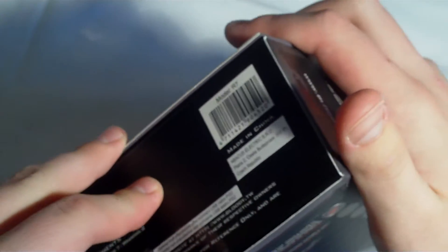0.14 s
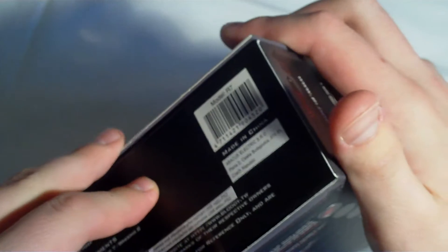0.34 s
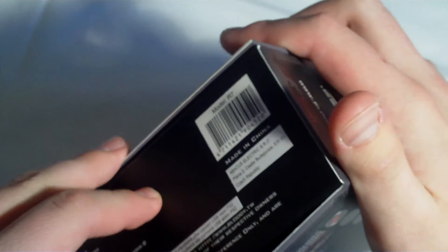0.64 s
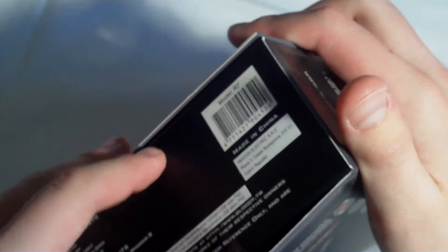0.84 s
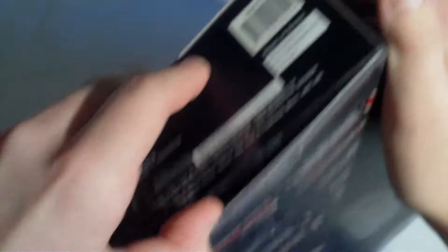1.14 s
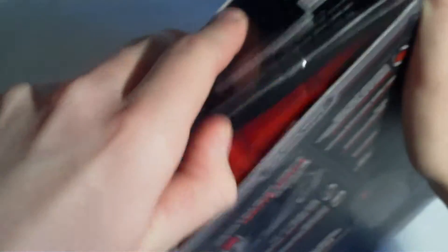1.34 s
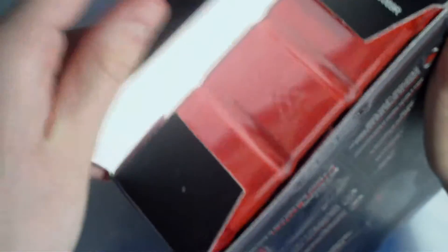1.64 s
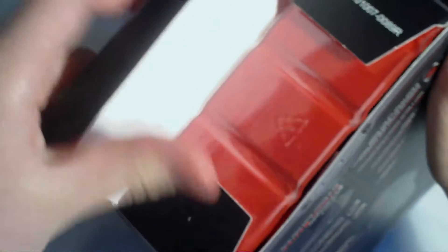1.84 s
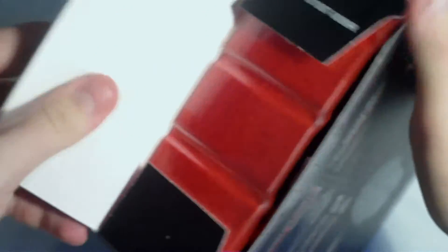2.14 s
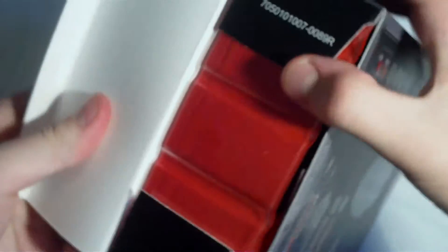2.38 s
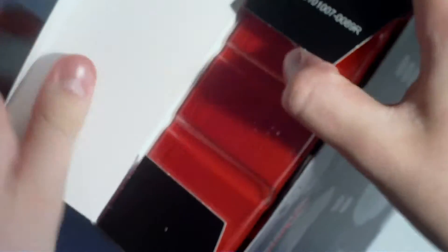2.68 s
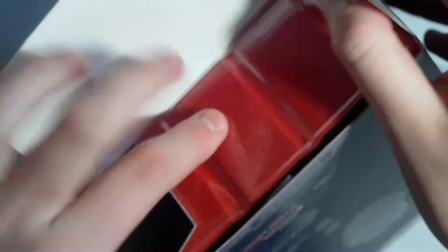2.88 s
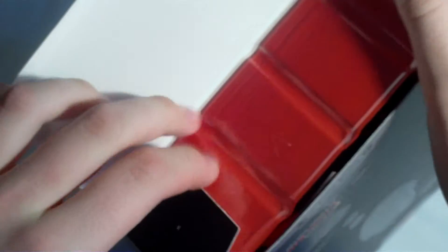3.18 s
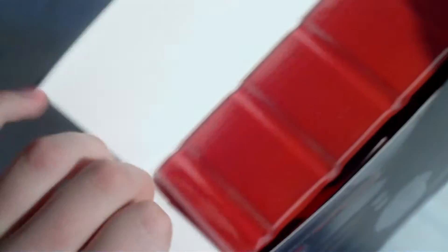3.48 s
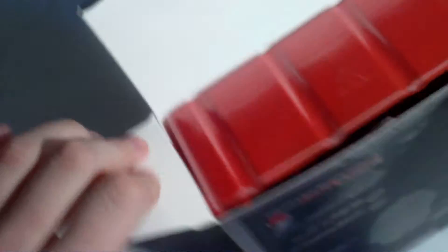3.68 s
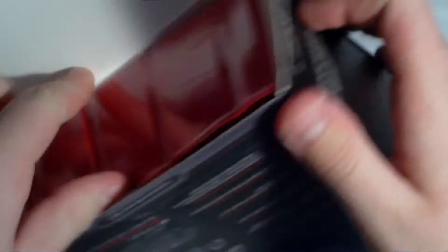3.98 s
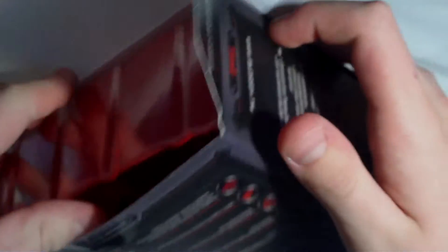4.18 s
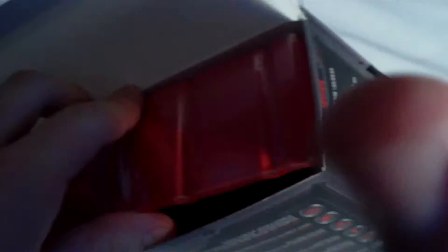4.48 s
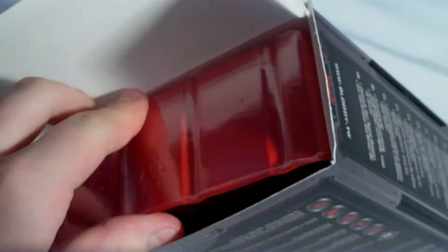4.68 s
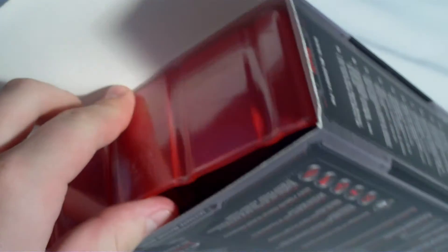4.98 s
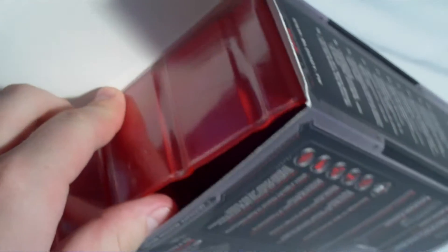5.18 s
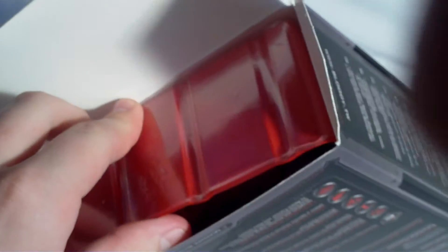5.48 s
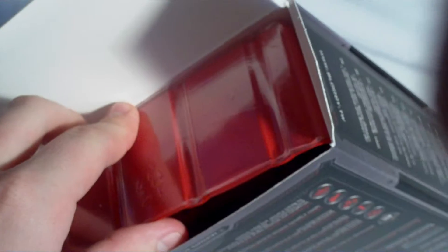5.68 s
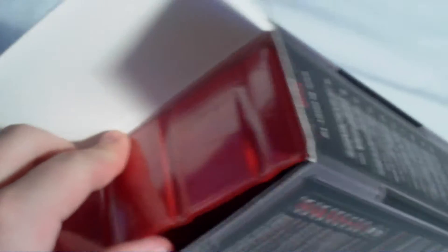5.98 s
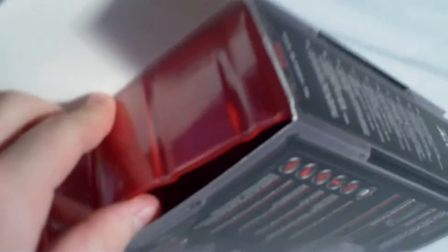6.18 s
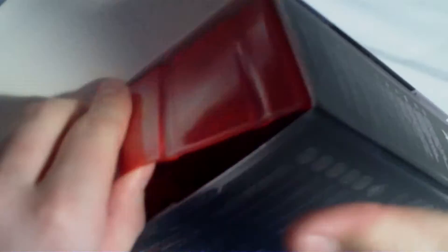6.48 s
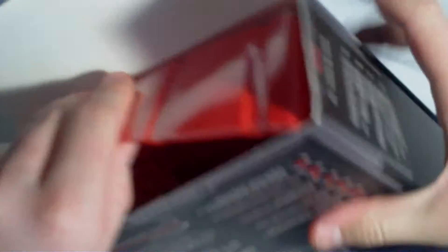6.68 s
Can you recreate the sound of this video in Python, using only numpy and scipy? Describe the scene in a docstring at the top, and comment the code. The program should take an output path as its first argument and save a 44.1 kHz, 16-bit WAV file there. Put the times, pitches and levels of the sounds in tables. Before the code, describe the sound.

Hands rustle, tap and creak open a glossy cardboard box up close, then a thin plastic tray crackles and snaps loudly as it is pulled.

```python
"""Hands open a glossy cardboard box close to a microphone: taps and creaks of the flaps are noise jolts and
firm pushes ringing through banks of card resonances, and rubbing is gritty noise swelled stroke by stroke.
Then a thin plastic tray is pulled, creaks and snaps loudly: such jolts in plastic resonances, with a thin ring.
Single-band noise swells add low wall thumps, thin tones and soft rubs; steady shaped noise hisses and rumbles."""
import sys
import numpy as np
from scipy import signal
from scipy.fft import rfft, irfft, next_fast_len
from scipy.io import wavfile
from scipy.ndimage import map_coordinates

SR = 44100
rng = np.random.default_rng(int(sys.argv[2]) if len(sys.argv) > 2 else 0)


def materialize(psi):
    """Save the field psi as 16-bit PCM at rate SR to the path in sys.argv[1].

    A 1-D psi becomes a single channel; in a 2-D psi each row is a channel.
    """
    bounded = np.clip(np.atleast_2d(psi).T, -1, 1)
    quanta = np.round(bounded * 32767).astype(np.int16)
    wavfile.write(sys.argv[1], SR, quanta)


def volts_from_decibels(level):
    """Turn decibel levels (scalar or array-like) into linear amplitude factors."""
    exponent = np.asarray(level, float) / 20
    return 10 ** exponent


N = 301423  # samples

# resonances of the card, one list each for walls, hollow, edges and skin: (f/Hz, width/Hz, relative level/dB)
CARD = [
    [(83, 120, -9.5), (195.6, 63, 2), (363.6, 140, 3.5)],
    [(762, 238, 8), (896.6, 140, 9), (1120, 530, 0.5)],
    [(2025, 1150, 6), (3930, 2100, -5), (5210, 1200, 0.5)],
    [(6580, 2000, -4.5), (9510, 3200, -7), (14150, 970, -20.5)],
]


def unit(x):
    """Bring to rms 1."""
    return x / np.sqrt(np.mean(x ** 2) + 1e-20)


def along(points, hz):
    """Read a curve of (f/Hz, value) points on a log frequency axis."""
    f, v = np.transpose(points)
    return np.interp(np.log(hz + 1), np.log(f + 1), v)


def wobble(rate):
    """A smooth random curve through rate knots a second."""
    knots = rng.standard_normal(int(N * rate / SR) + 4)
    return map_coordinates(knots, [np.arange(N) * rate / SR])


def filtered(x, response):
    """Shape x by a complex response of frequency, scaled to keep the power of white noise."""
    m = next_fast_len(N + SR // 2)
    gain = response(np.fft.rfftfreq(m, 1 / SR))
    gain = gain / np.sqrt(np.mean(abs(gain) ** 2))
    return irfft(rfft(x, m) * gain, m)[:N]


def rung(x, modes, order=1):
    """Ring x through parallel resonances of alternating sign; a higher order darkens the valleys."""
    def response(f):
        total = 0
        for k, (centre, width, db) in enumerate(modes):
            resonance = 1j * f * width / (centre * centre - f * f + 1j * f * width)
            total = total + (-1) ** k * volts_from_decibels(db) * resonance ** order
        return total
    return filtered(x, response)


def bursts(times, levels_db, rise, t60, drag_db, drag_t60, firm=0):
    """Short noise jolts, each trailing into a weaker drag; the share firm of a jolt's energy is one push."""
    t = np.arange(SR // 5) / SR
    swell = 1 - np.exp(-(t / rise) ** 2)
    jolt = swell * volts_from_decibels(-60 * t / t60)
    drag = swell * volts_from_decibels(drag_db - 60 * t / drag_t60)
    lead = 1.5 * rise  # s from the onset to the contact time
    push = np.sqrt(firm) * np.linalg.norm(jolt) * (np.arange(len(t)) == round(lead * SR))
    shape = np.sqrt(1 - firm) * jolt + drag
    out = np.zeros(N + len(t))
    for s, db in zip(times, levels_db):
        start = round((s - lead) * SR)
        out[start:][:len(t)] += volts_from_decibels(db + 1.5) * (push + shape * rng.standard_normal(len(t)))
    return out[:N]


def struck(events, body, follow, rise, t60, drag_db, drag_t60):
    """Each contact jolts walls, hollow, edges and skin; the higher the part, the faster the jolt rises.
    Rise, t60 and drag are those of the hollow; also returns the bare skin jolts."""
    firm = 0.4  # energy share of the push in walls and hollow
    s, ring, thump, tick = np.transpose(events)
    crack = follow[0] * tick + follow[1]  # the edges follow the sharpness in part
    walls, hollow, edges, skin = body
    wall_jolts = bursts(s, ring + thump + 4, 1.2 * rise, 0.96 * t60, drag_db + 3.5, drag_t60, firm)
    hollow_jolts = bursts(s, ring, rise, t60, drag_db, drag_t60, firm)
    edge_jolts = bursts(s, ring + crack, 0.69 * rise, 1.056 * t60, drag_db, drag_t60)
    skin_jolts = bursts(s, ring + tick, rise / 2, 0.81 * t60, drag_db - 12.5, drag_t60, firm / 2)
    low = rung(wall_jolts, walls, order=2)
    mid = rung(hollow_jolts, hollow, order=2)
    high = rung(edge_jolts, edges, order=2)
    top = rung(skin_jolts, skin, order=2)
    return low + mid + high + top, skin_jolts


def hiss():
    """Steady hiss and rumble: white noise shaped by a fixed spectrum."""
    # spectrum of the noise bed: (f/Hz, relative level/dB)
    spectrum = [(15, -12.5), (25, 2.5), (317, -6.5), (863, -9.5), (988, -6.5), (1160, -13.5), (6740, -23.5),
                (14800, -30.5), (16000, -56)]
    return volts_from_decibels(-63) * filtered(rng.standard_normal(N), lambda hz: volts_from_decibels(along(spectrum, hz)))


def band_swells():
    """Noise in one resonance, swelling and fading: from low wall thumps to thin tones and soft tray rubs."""
    # single-band swells: (middle t/s, half length/s, f/Hz, width/Hz, level/dB)
    bands = [(0.244, 0.22, 764, 89, -65), (1.41, 0.054, 2110, 1500, -47.5),
             (1.914, 0.021, 4700, 1000, -57.5), (2.09, .018, 192, 40, -42.5), (2.27, 0.017, 338, 90, -51),
             (3.569, 0.012, 3970, 600, -47.5), (4.697, 0.099, 1190, 690, -65),
             (5.385, 0.034, 1060, 403, -61.5), (5.368, .04, 2080, 800, -63.5), (5.597, 0.1, 1400, 900, -62)]
    t = np.arange(N) / SR
    out = np.zeros(N)
    for s, half, hz, width, db in bands:
        swell = np.exp(-((t - s) / half) ** 2)
        out += volts_from_decibels(db) * swell * rung(rng.standard_normal(N), [(hz, width, 0)], order=2)
    return out


def tray():
    """Buckling snaps of the thin plastic tray; the sharp ones leave a thin ring."""
    # snaps: (t/s, strength level/dB, weight/dB, sharpness/dB; the last two against the strength)
    snaps = [(5.015, -49, -17, -40), (5.065, -49, -12, -40), (5.231, -38, -17, -57),
             (5.48, -42.5, -21, -42), (5.507, -25.5, -23.5, -20), (5.524, -39, -24, -8.5),
             (5.623, -35, -22, -18.5), (5.787, -41, -28, -2.5), (5.797, -31, -22, -5),
             (5.835, -35.5, -6.5, -22), (5.868, -54, -25, 1), (5.878, -21, -24, -48), (6.006, -46, -28, 4),
             (6.018, -34.5, -23, -7), (6.033, -32.5, -33, -10), (6.064, -8, -26, -38),
             (6.079, -23, -19, -33), (6.106, -9, -27, -20), (6.109, 2, -18.5, -1), (6.185, -32, -20, -25),
             (6.254, -42.5, -4.5, -16), (6.279, -29.5, -10.5, -45), (6.302, -12.5, -23.5, -55),
             (6.312, -17.5, -13, -59), (6.32, -21.5, -11, -47), (6.341, -29.5, -11.5, -25.5),
             (6.361, -26.5, -12.5, -34.5), (6.371, -30, -9, -27), (6.382, -31.5, -8, -28.5),
             (6.431, -40.5, -8.5, -46), (6.715, -44.5, -21, -11.5), (6.745, -36, -27, -16.5)]
    # resonances of the plastic, listed by walls, hollow, edges and skin: (f/Hz, width/Hz, relative level/dB)
    plastic = [
        [(202, 230, 2.2), (330, 140, 3.6)],
        [(756, 230, 0), (1000, 210, 0.5), (1170, 540, -4)],
        [(1826, 370, -0.42), (2505, 560, 1), (3540, 800, -3.3)],
        [(4796, 3400, -3.5), (7400, 3600, 2.5), (11480, 2000, -21.5)],
    ]
    # narrow resonances of the thin wall that sings on: (f/Hz, width/Hz, relative level/dB)
    sheen = [(3490, 24, 2), (4100, 50, -5), (7400, 40, 0)]
    follow = (0.63, -1.8)  # how far the edges follow the sharpness: (share, dB)
    body, jolts = struck(snaps, plastic, follow, rise=0.001, t60=0.014, drag_db=-23.5, drag_t60=0.06)
    return body + volts_from_decibels(-28) * rung(jolts, sheen, order=1.5)


def rubbing():
    """Strokes of fingers and flaps: a steady slide with small catches, sounding through the parts of the box."""
    # strokes: (middle t/s, half length/s, pressure level/dB, speed/dB against the pressure)
    strokes = [(0, 0.069, -55, -21), (1.21, 0.09, -59.5, -10.5), (1.27, 0.019, -40.5, -3.5),
               (1.303, 0.052, -45.5, -10.5), (1.403, .07, -52, -21), (1.454, 0.065, -48.5, -5),
               (1.914, 0.11, -65, -9.5), (2.15, 0.12, -55, -7), (2.2, 0.42, -62, -13),
               (2.486, 0.054, -52, -12), (2.613, 0.043, -60, -8.5), (2.737, 0.053, -49, -17),
               (2.9, 0.077, -50, -12.5), (2.966, 0.033, -50.5, -16), (3.07, 0.096, -57.5, -9.5),
               (3.397, 0.022, -49.5, -17.5), (3.51, 0.073, -55.5, -16), (3.578, 0.079, -66, 4),
               (3.836, 0.14, -55.5, -11), (4.07, 0.12, -56.5, -15.5), (4.226, 0.039, -50, -11),
               (4.372, 0.18, -60, -13), (6.086, 0.12, -53.5, -14.5), (6.793, 0.09, -54, -19)]
    bite, rise, fall = 0.33, 0.5, 1.35  # peak's lead, rise and fall of a stroke, in half lengths
    # flap rasp, edge squeak and gloss fizz grow with a stroke's speed: (share, dB)
    rasp, squeak, fizz = (0.44, -1.5), (1.2, 2.2), (0.93, -0.39)
    s, half, press_db, speed_db = np.transpose(strokes)
    phase = (np.arange(0, N, 64)[:, None] / SR - s) / half + bite
    swell = np.exp(-2 * (phase / np.where(phase < 0, rise, fall)) ** 2)  # power, one column a stroke

    def envelope(share, db):
        power = swell @ volts_from_decibels(2 * (press_db + share * speed_db + db))
        return np.sqrt(np.repeat(power, 64)[:N])

    catches = (rng.random(N) < 140 / SR) * rng.uniform(0.2, 1.6, N)  # the skin sticks and lets go
    catch_fade = volts_from_decibels(-60 * np.arange(SR // 20) / SR / 0.03)
    pressure = 1 + signal.fftconvolve(catches, catch_fade)[:N]

    def grit(own_db):
        return unit(rng.standard_normal(N) * pressure * volts_from_decibels(own_db * wobble(30)))

    walls = volts_from_decibels(-2.5) * rung(grit(2), CARD[0])
    hollow = rung(grit(2), CARD[1], order=2)
    flap = rung(grit(2), CARD[2][:1], order=2)
    edge = rung(grit(2.5), CARD[2][1:], order=2)
    gloss = rung(grit(1.2), CARD[3], order=2)
    inside = envelope(0, 0) * (walls + hollow)
    return inside + envelope(*rasp) * flap + envelope(*squeak) * edge + envelope(*fizz) * gloss


def flaps():
    """Contacts on the card flaps, and card edges creaking past each other in small slips, all alike."""
    # contacts: (t/s, strength level/dB, weight/dB, sharpness/dB; the last two against the strength)
    contacts = [(0.454, -32.5, -11.5, -48), (0.46, -29, -5.5, -33), (0.609, -31.5, -9.5, -55),
                (0.991, -44, -4, -23), (1.253, -31, -1, -8), (1.259, -27.5, -4, -12.5),
                (1.285, -24.5, -16, -15), (1.311, -32, -35, -8), (1.437, -34, -10, -1),
                (1.441, -18, -7, -24), (1.453, -19.5, -13, -11.5), (1.829, -46, -22, -3),
                (1.858, -44.5, -20, -13), (1.915, -43.5, -27, -6.5), (2.112, -41, -9, 9),
                (2.142, -47, -5, 8.5), (2.166, -37.5, -32, 4), (2.18, -49, -2, 2), (2.193, -42, -3.5, 8.5),
                (2.465, -32.5, -32, -11.5), (2.549, -45, -41, 0), (2.595, -41.5, -34, -0.5),
                (2.847, -40, -14, -21), (2.877, -34, 0, -7), (2.937, -49.5, -4, 7), (2.945, -28, -8.5, -42),
                (3.017, -42.5, 7, -12), (3.026, -37, -12, -13), (3.241, -49.5, -1.5, -4.5),
                (3.361, -37, -11, -26), (3.376, -34, -29, -19), (3.394, -44.5, -20, -8),
                (3.455, -39.5, -11, -23), (3.57, -53, 10.5, 0), (3.63, -42.5, -8, -19),
                (3.802, -58, 7.5, 14), (4.01, -45.5, 0, 0), (4.081, -30.5, -16, -27.5),
                (4.215, -30, -32, -21), (4.278, -31, -32, -37), (4.285, -32.5, -27, -27)]
    # slips of the creaking edges: (t/s)
    slip_times = [0.582, 1.003, 1.055, 1.076, 1.098, 1.118, 1.157, 1.181, 1.659, 2.055, 2.078, 2.096, 2.386,
                  2.449, 2.713, 3.1, 3.14, 3.16]
    slip = (-51.5, -4.5, -5)  # strength, weight and sharpness in dB, as for a contact
    follow = (0.45, 0.2)  # how far the edges follow the sharpness: (share, dB)
    events = contacts + [(s, *slip) for s in slip_times]
    return struck(events, CARD, follow, rise=0.001124, t60=0.018, drag_db=-21.5, drag_t60=0.29)[0]


def scene():
    """Box and tray over a steady hiss."""
    hands = flaps() + tray() + rubbing() + band_swells()
    return (hands + hiss())[None]


def band_limit(x):
    """A steep low-pass at the top of the band."""
    return signal.sosfilt(signal.butter(12, 16220, fs=SR, output="sos"), x)


def record(dry):
    """The loudest snap clips the recorder, smoothly towards 0.85, and the treble is cut steeply."""
    clipped = dry / (1 + abs(dry / 0.85) ** 6) ** (1 / 6)
    treble_cut = signal.butter(10, 15300, fs=SR, output="sos")  # low-pass, Hz
    dull = signal.sosfilt(treble_cut, clipped)
    return band_limit(dull)


dry = scene()
out = record(dry)
materialize(out)
```